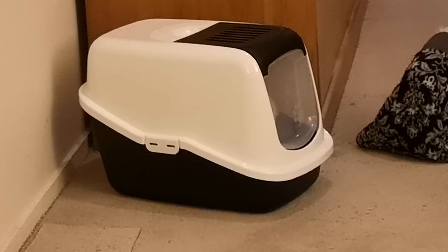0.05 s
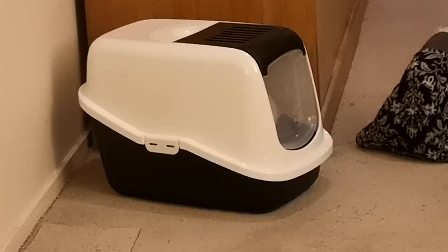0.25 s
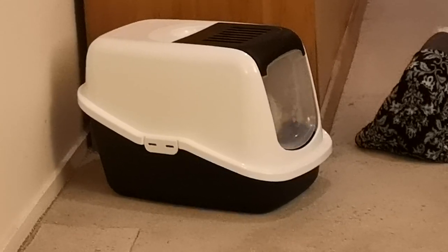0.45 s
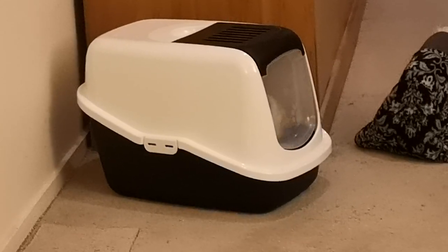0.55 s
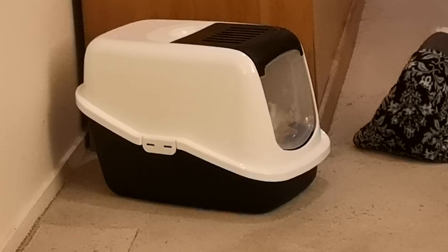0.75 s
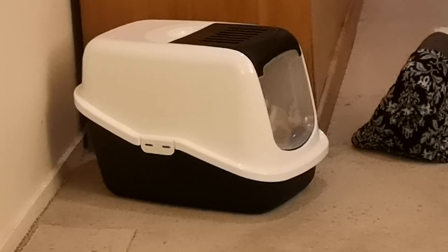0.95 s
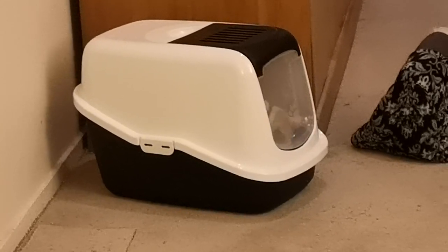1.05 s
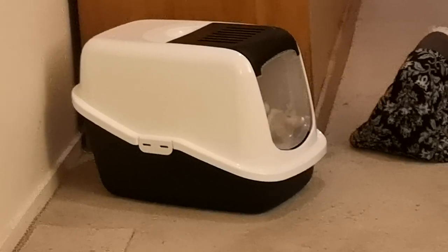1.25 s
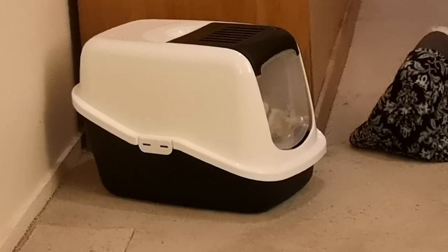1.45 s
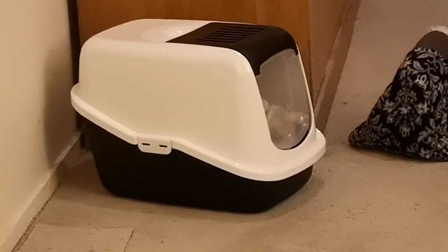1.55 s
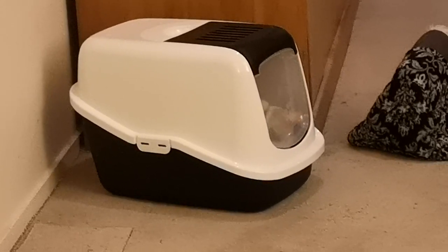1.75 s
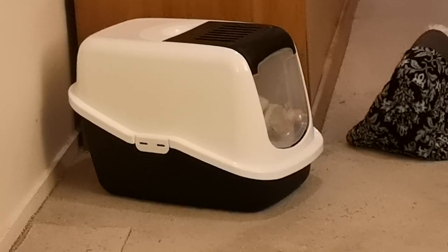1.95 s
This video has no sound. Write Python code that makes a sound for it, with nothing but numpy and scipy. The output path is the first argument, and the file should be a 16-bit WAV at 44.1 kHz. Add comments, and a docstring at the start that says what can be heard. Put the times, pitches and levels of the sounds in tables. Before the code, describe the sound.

Faint, gritty scratching of a cat digging in a hooded litter box follows a brief rumble and soft bumps on the hand-held microphone. A few grains tick against the plastic, over the quiet room's steady hiss and faint hum.

```python
"""Steady hiss and a faint hum sit under a quiet room. Almost at once a low flutter, soft bumps and a
brief rush of hiss come up, right at the hand-held microphone. From about one second in, a couple of
metres away, a cat paws at the litter inside a covered plastic box. Each stroke sets off a shower of
tiny grain collisions that hiss and ring the hood; a few grains tick on the wall."""
import sys
import numpy as np
from scipy import signal
from scipy.fft import rfft, irfft
from scipy.io import wavfile

SR = 44100
rng = np.random.default_rng(int(sys.argv[2]) if len(sys.argv) > 2 else 0)


def digitize_waveform(pressure):
    """Quantize a signal to 16-bit integers and store it at the path in sys.argv[1].

    Rows of a 2-D input are taken as channels; values are limited to [-1, 1].
    """
    field = np.atleast_2d(pressure).T
    bounded = np.clip(field, -1, 1)
    quanta = np.round(bounded * 32767).astype(np.int16)
    wavfile.write(sys.argv[1], SR, quanta)


N = 88200

# Low room tone plus the microphone's own hiss. Each row: frequency in Hz, relative level in dB.
HISS_SPECTRUM = [(60, 9.5), (150, -0.5), (230, 0), (300, -8.5), (400, -8.5), (600, -11.5), (800, -7),
                 (1050, -4.5), (1400, -4.5), (1780, 1.5), (2100, -2), (2600, -6), (3100, -13.5),
                 (4500, -18.5), (7000, -23), (9500, -23.5), (11000, -29.5), (15500, -29.5)]
# How alike that hiss is left and right. Each row: frequency in Hz, correlation from 0 to 1.
HISS_CORRELATION = [(100, 1), (250, 1), (400, 0), (700, 0.94), (1100, 0.53), (1700, 0.14), (3000, 0),
                    (8000, 0)]
# Mains hum in the room. Each row: frequency in Hz, level in dB.
MAINS_HUM = [(100, -64), (200, -84.5)]
# Faint appliance whines. Each row: frequency in Hz, level in dB.
APPLIANCE_WHINES = [(1315, -89.5), (1576, -79), (1717, -84), (2018, -79.5), (2271, -88), (10240, -96.5)]
# Low flutter on the microphone. Each row: time in seconds, level in dB.
FLUTTER_LEVELS = [(0, -69), (.14, -57.5), (.21, -37.5), (.27, -40.5), (.33, -34), (.44, -29), (.52, -38.5),
                  (.6, -55.5), (.72, -60.5), (.85, -51), (1.03, -56.5), (1.23, -45.5), (1.33, -55.5),
                  (1.57, -45.5), (1.67, -55), (1.76, -43), (1.86, -55.5), (2, -62.5)]
# Spectrum of the flutter. Each row: frequency in Hz, relative level in dB.
FLUTTER_SPECTRUM = [(10, 2.5), (25, 9.5), (50, 0), (90, -11.5), (150, -36), (250, -40), (400, -76),
                    (800, -90)]
# Soft bumps on the microphone. Each row: centre in seconds, peak in dB, pitch in Hz.
MIC_BUMPS = [(0.202, -33.5, 36.4), (0.238, -35.5, 52), (0.295, -36, 91), (.326, -27.5, 61),
             (0.372, -27, 59.4), (0.398, -28, 83), (.408, -31, 84), (0.465, -19.5, 77.8), (0.518, -31, 26),
             (1.119, -42.5, 59.4), (1.194, -44, 31.6), (1.42, -36.5, 33.6), (1.528, -32, 39.5),
             (1.558, -39, 62.4), (1.628, -46.5, 52.4), (1.744, -35.5, 36)]
# Rush of hiss during the strongest flutter. Each row: time in seconds, level in dB.
RUSH_LEVELS = [(0, -82), (.17, -93), (.23, -59.5), (.28, -64), (.35, -58), (.44, -54), (.51, -57),
               (.58, -68), (.7, -104)]
# Spectrum of the rush. Each row: frequency in Hz, relative level in dB.
RUSH_SPECTRUM = [(200, 16), (500, -9), (1200, -1.5), (1850, 7), (3200, -8.5), (5000, -16.5), (9000, -19),
                 (11000, -26), (16000, -28)]
# Paw strokes in the box. Each row: start, attack, hold and release in seconds,
# grain hiss in dB, drive to the hood in dB.
PAW_STROKES = [(1.088, 0.022, 0.13, .05, -84, -71), (1.34, 0.02, 0.033, .02, -68.5, -67.5),
               (1.401, 0.016, 0.031, 0.029, -62, -62), (1.484, 0.017, 0.039, .035, -65.5, -63),
               (1.576, .005, .012, 0.0092, -80, -62.5), (1.607, .008, 0.019, 0.046, -71.5, -63.5),
               (1.67, 0.0083, 0.054, 0.042, -76.5, -64), (1.816, 0.0087, 0.035, 0.057, -63.5, -59),
               (1.874, 0.023, 0.033, 0.022, -63, -61.5)]
# Spectrum of the colliding litter. Each row: frequency in Hz, relative level in dB.
GRAIN_SPECTRUM = [(150, -2), (400, 1.5), (1000, 1), (2500, 1), (3700, 1.5), (4600, -0.5), (5700, 2),
                  (7500, -3), (9600, -5.5), (11000, -20), (16000, -29)]
# Resonances of the plastic hood. Each row: frequency in Hz, width in Hz, relative level in dB.
HOOD_MODES = [(217, 88, -0.5), (454, 23, 3.5), (532, 27, -13), (770, 200, -9), (1000, 89, -6.5),
              (1390, 180, -3.5), (1765, 126, 5), (1976, 66, 2.5), (2100, 270, -16), (3490, 280, -6)]
# Grains flicked against the wall. Each row: start in seconds, drive to the hood in dB.
WALL_TICKS = [(1.383, -56), (1.408, -56), (1.586, -57.5), (1.626, -52), (1.684, -48), (1.814, -45.5),
              (1.846, -48)]

TIME, FREQS = np.arange(N) / SR, np.fft.rfftfreq(N, 1 / SR)


def undb(db):
    """Decibels to gain."""
    return 10 ** (np.asarray(db) / 20)


def unit(x):
    """Scale to rms 1."""
    return x / np.sqrt(np.mean(x ** 2))


def envelope(rows):
    """Gain over time from points in seconds and dB."""
    return undb(np.interp(TIME, *np.array(rows).T))


def colour(x, spectrum):
    """Shape a sound to a spectrum; white noise keeps its power."""
    hz, db = np.array(spectrum).T
    gain = undb(np.interp(np.log(np.maximum(FREQS, 1)), np.log(hz), db))
    return irfft(rfft(x) * unit(gain), N)


def resonance(hz, width):
    """Frequency response of one resonance."""
    f = np.maximum(FREQS, 1)
    return 1 / (1 + 1j * (f * f - hz * hz) / (f * width))


def wander(per_s):
    """Smooth random drift with a spread near 1."""
    return np.interp(TIME * per_s, np.arange(N), rng.standard_normal(N))


def at_microphone(x, lead_s=0.0004606):
    """The left side of the microphone leads the right very slightly."""
    half_lead = np.array([[1], [-1]]) * np.pi * FREQS * lead_s
    return irfft(rfft(x) * np.exp(1j * half_lead), N)


def background_hiss(level_db=-61):
    """Steady background hiss: low room tone plus the microphone's own hiss, peaking near 1.8 kHz."""
    alike = np.interp(FREQS, *np.array(HISS_CORRELATION).T)
    shared, separate = rfft(rng.standard_normal(N)), rfft(rng.standard_normal((2, N)))
    noise = irfft(np.sqrt(alike) * shared + np.sqrt(1 - alike) * separate, N)
    return undb(level_db) * colour(noise, HISS_SPECTRUM)


def electrical_hum(tones, waver_rad):
    """Mains or appliance tones in the room, each wavering in phase."""
    return sum(undb(db) * np.sqrt(2) * np.sin(2 * np.pi * hz * TIME + waver_rad * wander(per_s=12))
               for hz, db in tones)


def mic_flutter(upper_db=-16):
    """Low noise shaking the hand-held microphone, brighter when strong."""
    strength = envelope(FLUTTER_LEVELS)
    low = unit(colour(rng.standard_normal(N), FLUTTER_SPECTRUM))
    upper = unit(irfft(rfft(rng.standard_normal(N)) * resonance(hz=122, width=105) ** 3, N))
    return strength * (low + upper * undb(upper_db) * strength / strength.max())


def mic_bumps():
    """Each soft bump on the microphone is one push and one pull."""
    bumps = np.zeros(N)
    for centre, db, hz in MIC_BUMPS:
        phase = 2 * np.pi * hz * (TIME - centre)
        bumps -= undb(db) * phase * np.exp((1 - phase ** 2) / 2)
    return bumps


def rush():
    """A brief soft swell of hiss, spread wide across left and right."""
    return envelope(RUSH_LEVELS) * colour(rng.standard_normal((2, N)), RUSH_SPECTRUM)


def grain_collisions(per_s=4000, spread_db=4.5, catch_db=2, catches_per_s=70):
    """Dense collisions, mostly small, swelling and fading as the paw catches and slips."""
    hits = rng.random(N) < per_s / SR
    size = undb(spread_db * np.minimum(rng.exponential(size=N), 4))
    polarity = np.sign(rng.standard_normal(N))
    return unit(hits * size * polarity * undb(catch_db * wander(catches_per_s)))


def paw_strokes():
    """The paw drags through the litter; returns the grains' own hiss and their drive to the hood."""
    hiss_power, drive_power = np.zeros((2, N))
    for start, attack, hold, release, hiss_db, drive_db in PAW_STROKES:
        age = TIME - start
        effort = np.clip(age / attack, 0, 1) * np.exp(-np.maximum(age - attack - hold, 0) / release)
        hiss_power += (effort * undb(hiss_db)) ** 2
        drive_power += (effort * undb(drive_db)) ** 2
    hiss = colour(grain_collisions() * np.sqrt(hiss_power), GRAIN_SPECTRUM)
    return hiss, grain_collisions() * np.sqrt(drive_power)


def hood_ring(drive, dull_hz=3870):
    """The plastic hood and the air in it ring; the treble is lost on the way out."""
    response = sum(undb(db) * resonance(hz, width) for hz, width, db in HOOD_MODES)
    response /= 1 + (FREQS / dull_hz) ** 4
    return irfft(rfft(drive) * response / np.sqrt(np.mean(abs(response) ** 2)), N)


def across_room(x, t60_s=0.19, tail_db=3.5):
    """A couple of metres off, the microphone gets direct sound and a short tail, different each side."""
    t = TIME[:N // 4]
    tail = rng.standard_normal((2, len(t))) * np.exp(-np.log(1000) * t / t60_s) * (t > .003)
    tail /= np.sqrt(np.sum(tail ** 2, axis=1, keepdims=True))
    reverb = signal.fftconvolve(x[None], tail, axes=1)[:, :N]
    return (at_microphone(x) + undb(tail_db) * reverb) / np.hypot(1, undb(tail_db))


def wall_ticks(decay_s=0.0041):
    """Single grains strike the wall of the box, each a tiny burst of noise."""
    bursts = sum(undb(db) * (TIME >= start) * np.exp(-abs(TIME - start) / decay_s)
                 for start, db in WALL_TICKS)
    return bursts * rng.standard_normal(N)


def scene():
    """Hiss and hum throughout, rumble right at the microphone, the litter box further off."""
    hum = electrical_hum(MAINS_HUM, waver_rad=0.17)
    whines = electrical_hum(APPLIANCE_WHINES, waver_rad=0.95)
    background = at_microphone(background_hiss() + hum + whines)
    rumble = at_microphone(mic_flutter() + mic_bumps(), lead_s=0.00073)
    grain_hiss, hood_drive = paw_strokes()
    litter_box = grain_hiss + hood_ring(hood_drive + wall_ticks())
    return background + rumble + rush() + across_room(litter_box)


def record(dry):
    """The recorder cuts the treble steeply above 15650 Hz."""
    return signal.sosfilt(signal.ellip(10, .2, 70, 15650, fs=SR, output="sos"), dry)


dry = scene()
out = record(dry)
digitize_waveform(out)
```